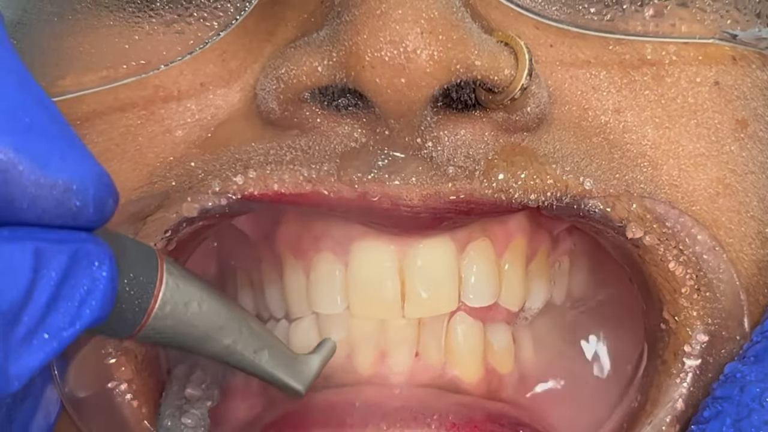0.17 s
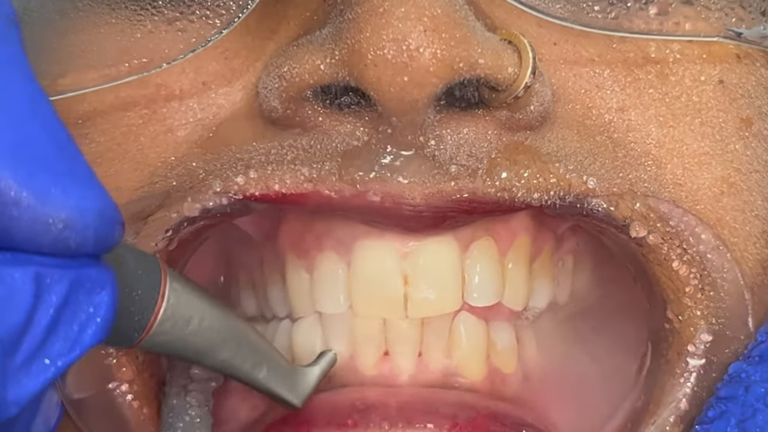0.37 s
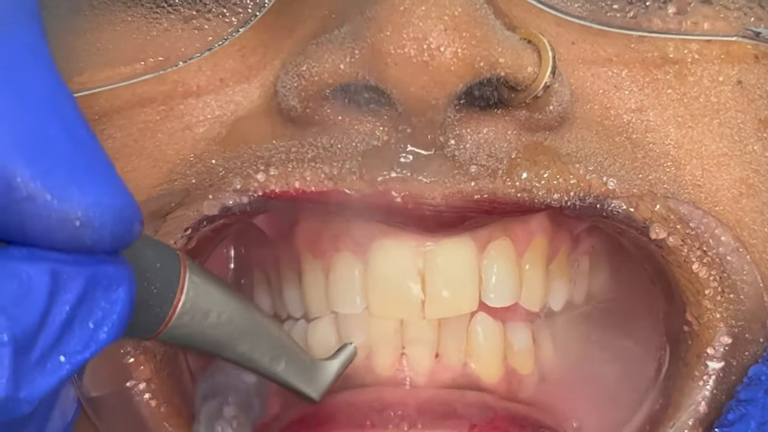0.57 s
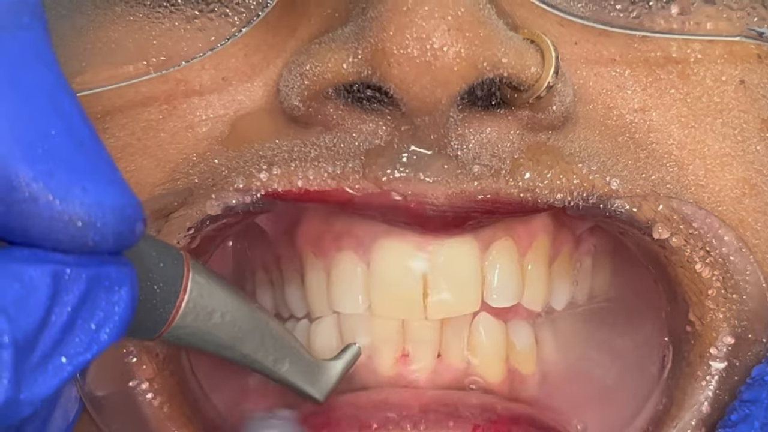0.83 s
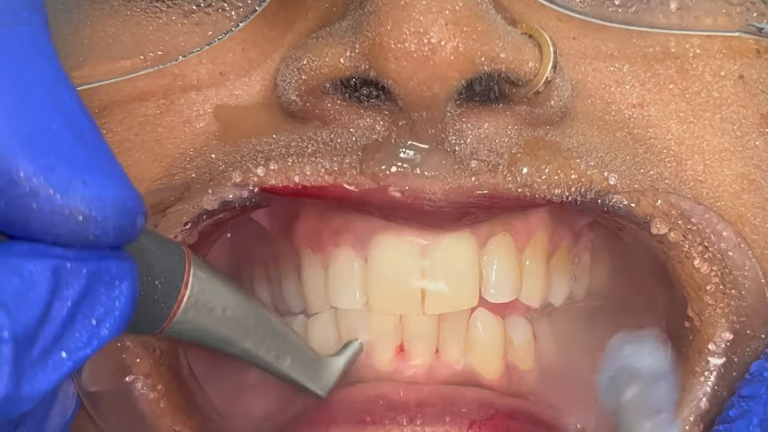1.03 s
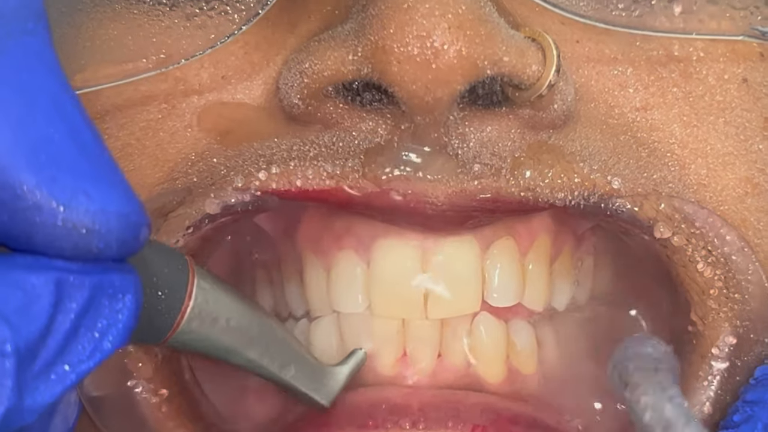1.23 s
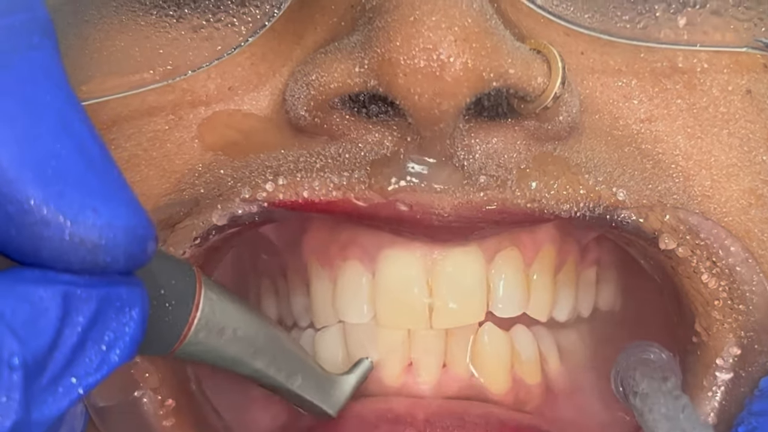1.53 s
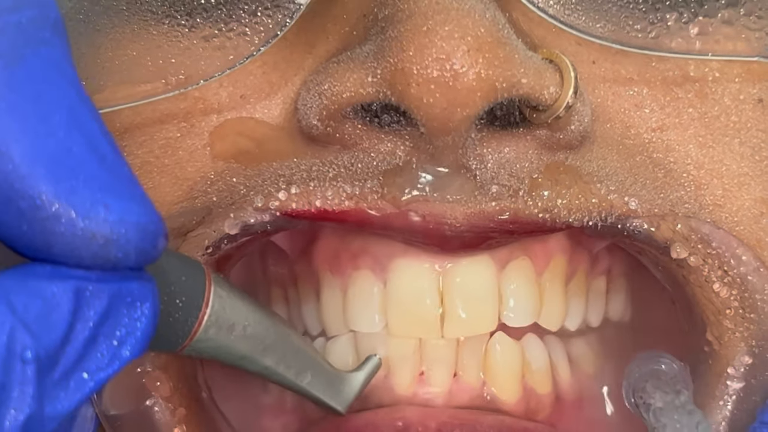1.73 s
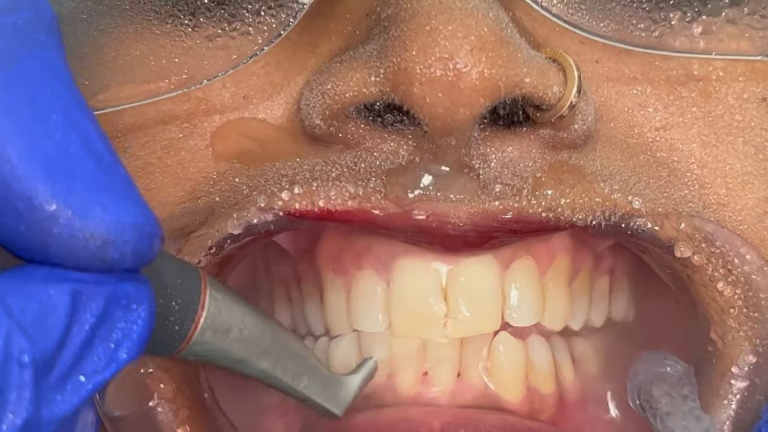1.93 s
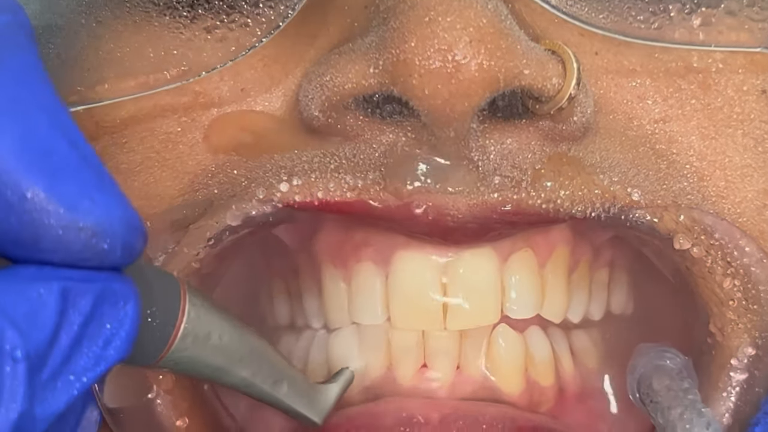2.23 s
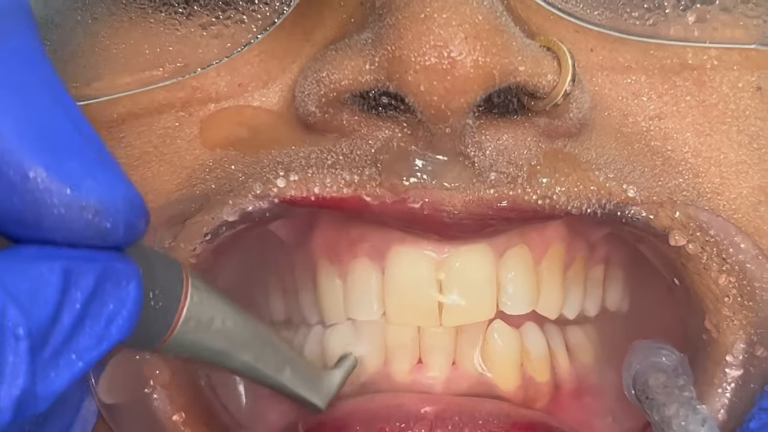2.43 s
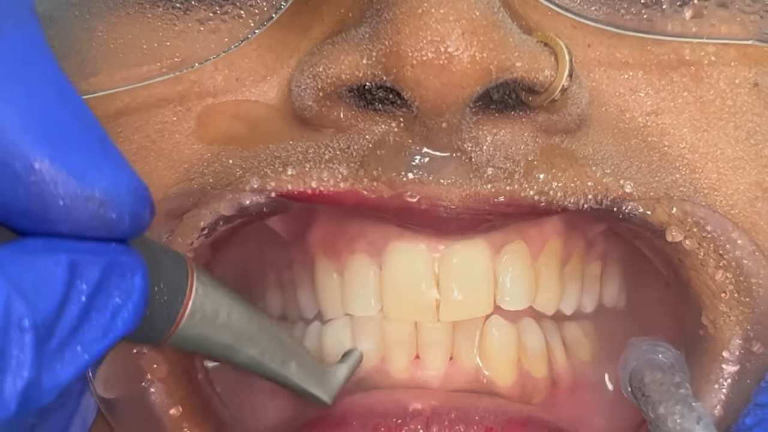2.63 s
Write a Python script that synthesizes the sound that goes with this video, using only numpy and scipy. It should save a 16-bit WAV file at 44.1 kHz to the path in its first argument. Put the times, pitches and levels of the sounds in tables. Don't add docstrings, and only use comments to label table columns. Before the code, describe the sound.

A dental polishing jet hisses continuously, bright and sputtering, as spray strikes teeth. A suction tube slurps at first, thins to airy rush, then gurgles again near the end; close stereo microphone, quiet treatment room with faint hum.

```python
import sys
import numpy as np
from scipy import signal
from scipy.fft import rfft, irfft
from scipy.io import wavfile
from scipy.ndimage import uniform_filter1d

SR = 44100
rng = np.random.default_rng(int(sys.argv[2]) if len(sys.argv) > 2 else 0)


def gain_from_db(level_db):
    decades = np.asarray(level_db, float) / 20
    return 10 ** decades


def to_wav(s):
    ch = np.atleast_2d(s).T
    pcm = np.round(np.clip(ch, -1, 1) * 32767)
    wavfile.write(sys.argv[1], SR, pcm.astype(np.int16))


N = 123480
HZ = np.maximum(np.arange(N // 2 + 1) * SR / N, 1)

# time_s, level_db
STRIKE_LEVEL = [(0, -29), (.04, -35), (.15, -28.5), (.32, -27), (.5, -28), (.64, -32), (.86, -29),
                (1.07, -27), (1.17, -34), (1.33, -29.5), (1.57, -26), (1.65, -20.5), (1.75, -22),
                (1.97, -23), (2.16, -28), (2.42, -30), (2.62, -28.5), (2.76, -31)]
# pitch_hz, density_db (per Hz)
STRIKE_COLOUR = [(3200, -32.5), (4650, -18.5), (5500, -16), (6900, -4), (7800, 2), (8700, -2.5), (9300, -5),
                 (11500, -18)]
# time_s, level_db
NOZZLE_LEVEL = [(0, -38), (.15, -37), (.26, -26.5), (.36, -34), (.75, -34.5), (.87, -32.5), (1.08, -33),
                (1.2, -35.5), (1.44, -30), (1.59, -38), (1.73, -27.5), (1.97, -26.5), (2.19, -29.5),
                (2.42, -27.5), (2.55, -23), (2.62, -29), (2.72, -39), (2.8, -20.5)]
# pitch_hz, density_db (per Hz)
NOZZLE_COLOUR = [(6000, -24), (9500, -10), (11600, -12), (12300, -2.5), (13100, -3.5), (13900, 0),
                 (14600, -2.5), (16200, -3.5)]
# centre_s, half_length_s, depth_db
CHOKES = [(.4, 0.049, -5.5), (0.991, 0.054, -8), (1.26, 0.052, -5), (1.41, 0.013, -0.5),
          (1.862, 0.058, -11), (2.034, 0.022, -5.5), (2.133, 0.045, 0), (2.209, 0.018, -2),
          (2.33, 0.052, -8), (2.515, 0.053, -14.5), (2.681, 0.017, -12)]
# pitch_hz, lead_rad
PORT_PHASE = [(7500, 0), (8100, 1.9), (9400, 2.0), (10200, 2.75), (11600, 3.3), (12000, 4.7), (13000, 5.65),
              (13300, 2 * np.pi)]
JET_DIFFUSE = 0.4

# pitch_hz, density_db (per Hz)
VENT_COLOUR = [(30, -27), (76, 1.5), (188, -3), (271, 8), (524, -9.5), (977, -9.5), (1550, -29),
               (2400, -18)]
# pitch_hz, width_hz, level_db
PUMP = [(75.3, 18, -58), (162.2, 7.3, -54), (242.4, 23, -52), (293.6, 10.3, -44.5), (353.4, 10.5, -53.5),
        (393, 7.8, -56.5)]

# start_s, peak_db
SLURPS = [(0.0159, -20.5), (0.1002, -32), (0.1366, -18), (0.1905, -14), (0.2314, -18), (0.2558, -15.5),
          (0.4683, -12.5), (0.4738, -10.5), (0.4844, -33), (0.4926, -14), (0.502, -23), (0.5417, -13.5),
          (0.6154, -25), (0.632, -13), (2.3012, -22), (2.3531, -18), (2.367, -13.5), (2.394, -14),
          (2.4344, -17), (2.4523, -14), (2.4674, -16.5), (2.5212, -18.5), (2.532, -23), (2.5511, -18.5),
          (2.583, -33), (2.6039, -20), (2.6134, -28), (2.6474, -19), (2.7182, -19), (2.7412, -22)]
SLURP_RISE_S, SLURP_FALL_S, SLURP_GAIN_DB = 0.001, 0.0035, -9
# time_s, level_db
NEAR_TIP = [(0, -35), (.05, -36), (.15, -31), (.28, -34.5), (.33, -41.5), (.455, -42), (.47, -31),
            (.52, -37), (.63, -33), (.8, -34), (.84, -41), (2.8, -44.5)]
# time_s, level_db
FAR_TIP = [(0, -44), (.8, -51.5), (1.15, -40.5), (1.29, -46.5), (1.45, -40), (1.6, -36.5), (1.86, -43.5),
           (2.0, -36), (2.2, -42), (2.3, -36), (2.46, -39), (2.5, -40), (2.6, -32.5), (2.69, -40.5),
           (2.72, -37), (2.8, -36)]
TIP_MOVES_S = 1.0
# pitch_hz, width_hz, level_db
TUBE_NEAR = [(2660, 455, -1), (3187, 490, 1), (3810, 760, 0.5)]
# pitch_hz, width_hz, level_db
TUBE_FAR = [(2630, 440, -11), (3740, 630, 0), (4670, 810, -2)]
# pitch_hz, width_hz, level_db
HOSE = [(1083, 380, -3), (1302, 320, -4)]
HOSE_DB = -15

KNOCK_S, KNOCK_DB, KNOCK_FALL_S, KNOCK_HZ = 1.305, -40.5, 0.022, 400

# pitch_hz, correlation (-1 to 1)
LIKENESS = [(60, .97), (320, 0.97), (500, 0.37), (1200, 0.7), (1800, 0.067), (2900, 0.16), (3700, 0.89),
            (5200, 0.93)]
# pitch_hz, balance_db
BALANCE = [(300, 0), (420, 2.5), (550, -2.5), (1050, -5.5), (1400, 0.5), (1900, -9.5), (3500, 5.5),
           (4400, 0.5)]
MIC_LOW_HZ = 64.6


def rms_one(x):
    return x / np.sqrt(np.mean(x ** 2) + 1e-20)


def level_over_time(rows):
    time_s, level_db = np.transpose(rows)
    return np.interp(np.arange(N) / SR, time_s, level_db)


def at_hz(points):
    pitch_hz, value = np.transpose(points)
    return np.interp(np.log(HZ), np.log(pitch_hz), value)


def drift(rate_hz):
    pole = np.exp(-2 * np.pi * rate_hz / SR)
    wander = signal.lfilter([1], [1, -2 * pole, pole * pole], rng.standard_normal(N + SR))
    return rms_one(wander[SR:])


def resonances(table):
    power = 0
    for hz, width, db in table:
        power = power + gain_from_db(2 * db) / (1 + ((HZ - hz) / (width / 2)) ** 2) ** 2
    return np.sqrt(power)


def grainy(height, gain, grain_db, grain_hz, patchy_db, patch_hz):
    droplets = rng.standard_normal((2, N)) * gain * gain_from_db(grain_db * drift(grain_hz))
    coloured = rfft(droplets) * height
    third_octave = 3 * np.log2(HZ)
    power, out = height ** 2, 0
    for k in range(12, 44):
        mask = np.sqrt(np.clip(1 - np.abs(third_octave - k), 0, 1))
        if np.sum(power * mask) > 1e-4 * power.sum():
            patch = irfft(coloured * mask * (1j ** k), N)
            out = out + patch * gain_from_db(patchy_db * drift(patch_hz))
    return out / np.sqrt(power.mean())


def enamel_strike(sputter, choke):
    hit = gain_from_db(level_over_time(STRIKE_LEVEL) + 0.52 * sputter + choke + 2.03)
    return grainy(gain_from_db(at_hz(STRIKE_COLOUR)), hit, 1.35, 440, 0.72, 24)


def nozzle_hiss(sputter, choke):
    tear = gain_from_db(level_over_time(NOZZLE_LEVEL) + 1.2 * sputter + 0.4 * choke + 4.07)
    return grainy(gain_from_db(at_hz(NOZZLE_COLOUR)), tear, 1.4, 300, 0.83, 23)


def jet():
    t = np.arange(N) / SR
    choke = sum(db * np.exp(-((t - s) / half) ** 2) for s, half, db in CHOKES)
    sputter = 0.17 * drift(12) + 0.84 * drift(25)
    return enamel_strike(sputter, choke) + nozzle_hiss(sputter, choke)


def ventilation():
    return grainy(gain_from_db(at_hz(VENT_COLOUR)) * (HZ < 5000), gain_from_db(-43), 0.69, 92, 1.14, 24)


def pump_hum():
    return grainy(resonances(PUMP), gain_from_db(-45 + 0.27 * drift(2.1)), 0.12, 30, 0.99, 6.8)


def slurp_surges():
    t = np.arange(2000) / SR
    shape = (1 - np.exp(-t / SLURP_RISE_S)) * np.exp(-t / SLURP_FALL_S)
    shape = shape / shape.max()
    surge = np.zeros(N + len(t))
    for s, db in SLURPS:
        start = int(s * SR)
        surge[start:start + len(t)] += gain_from_db(db + SLURP_GAIN_DB) * shape
    return surge[:N]


def suction():
    surge = slurp_surges()
    early = np.arange(N) / SR < TIP_MOVES_S
    near = gain_from_db(level_over_time(NEAR_TIP) + 0.62 * drift(41))
    far = gain_from_db(level_over_time(FAR_TIP) + 1.2 * drift(33))
    hose = gain_from_db(HOSE_DB) * uniform_filter1d(np.hypot(near, 0.68 * far), size=2000)
    near_tube = grainy(resonances(TUBE_NEAR), np.hypot(near, surge * early), 2.2, 290, 0.86, 22)
    far_tube = grainy(resonances(TUBE_FAR), np.hypot(far, surge * ~early), 2.2, 250, 0.57, 6)
    return near_tube + far_tube + grainy(resonances(HOSE), hose, 1.65, 150, 1.4, 10)


def dull_thump():
    after = np.maximum(np.arange(N) / SR - KNOCK_S, 0) / KNOCK_FALL_S
    low_pass = signal.butter(2, KNOCK_HZ, fs=SR, output="sos")
    thud = rms_one(signal.sosfilt(low_pass, rng.standard_normal((2, N))))
    return gain_from_db(KNOCK_DB) * thud * after * np.exp(1 - after)


def jet_at_ports():
    direct, scattered = rfft(jet())
    half_phase = at_hz(PORT_PHASE) / 2
    mid = direct * np.cos(half_phase)
    blend = np.sqrt(1 - JET_DIFFUSE) * direct + np.sqrt(JET_DIFFUSE) * scattered
    side = 1j * np.sin(half_phase) * blend
    return np.array([mid + side, mid - side])


def surroundings_at_ports():
    mid, side = rfft(ventilation() + pump_hum() + suction() + dull_thump())
    alike = at_hz(LIKENESS)
    mid = mid * np.sqrt((1 + alike) / 2)
    side = side * np.sqrt((1 - alike) / 2)
    tilt = gain_from_db(at_hz(BALANCE) / 2)
    return np.array([(mid + side) * tilt, (mid - side) / tilt])


def scene():
    return irfft(jet_at_ports() + surroundings_at_ports(), N)


def top_cut(x):
    return signal.sosfilt(signal.butter(12, 15770, fs=SR, output="sos"), x)


def record(dry):
    bass_cut = signal.butter(3, MIC_LOW_HZ, "high", fs=SR, output="sos")
    mix = signal.sosfilt(bass_cut, dry)
    return top_cut(mix)


dry = scene()
out = record(dry)
to_wav(out)
```